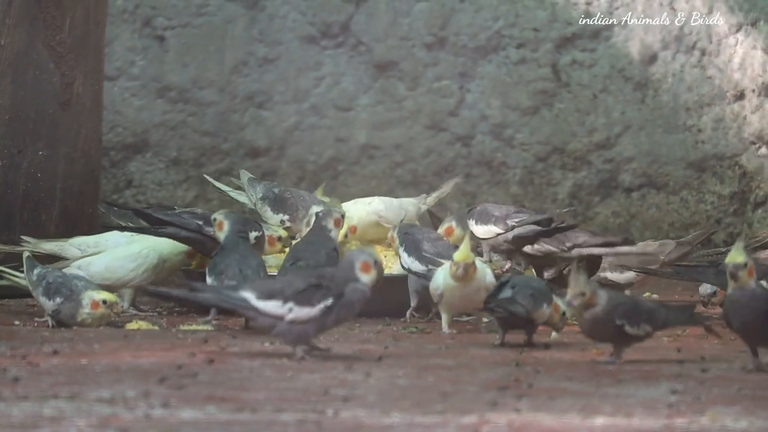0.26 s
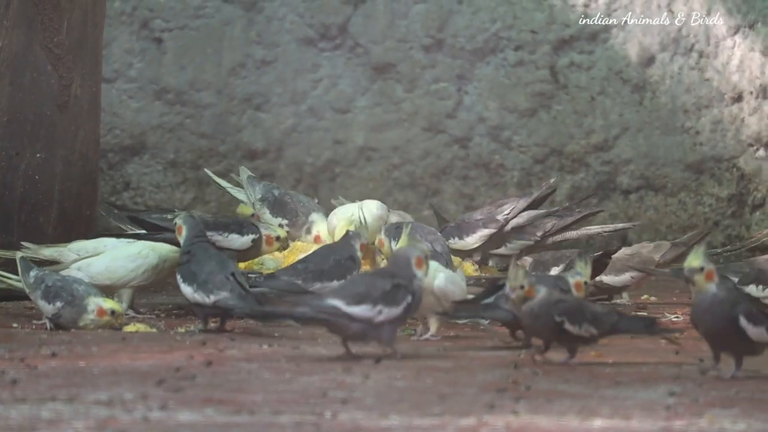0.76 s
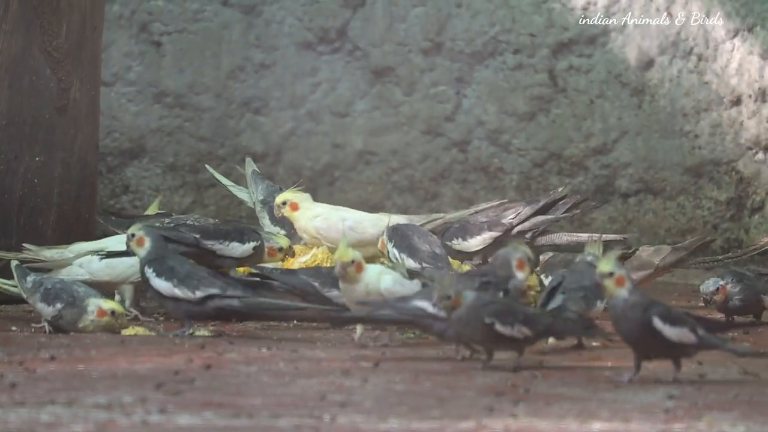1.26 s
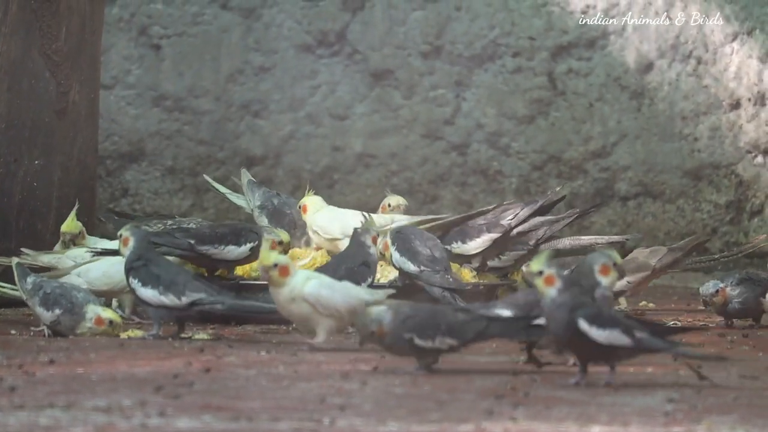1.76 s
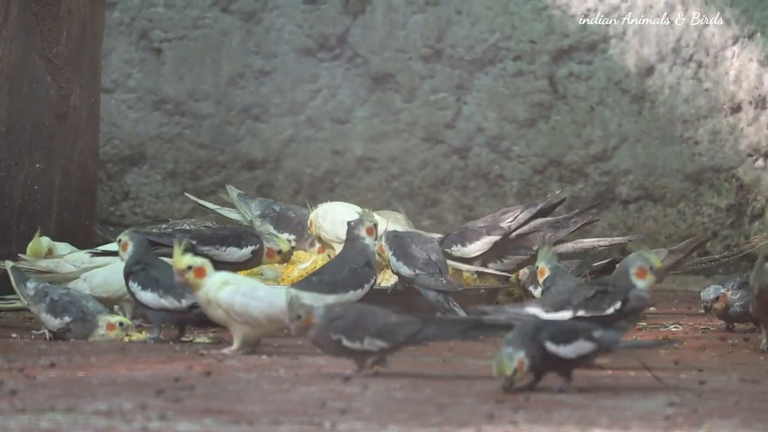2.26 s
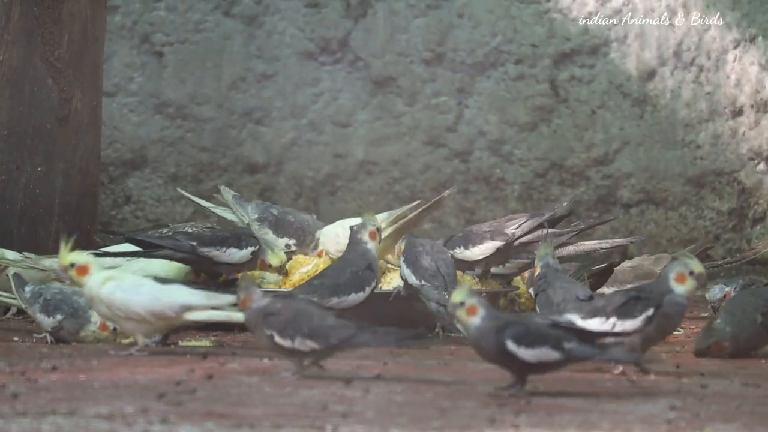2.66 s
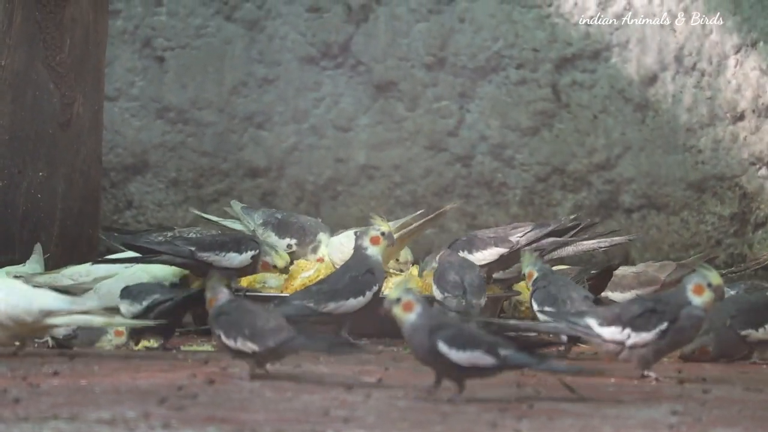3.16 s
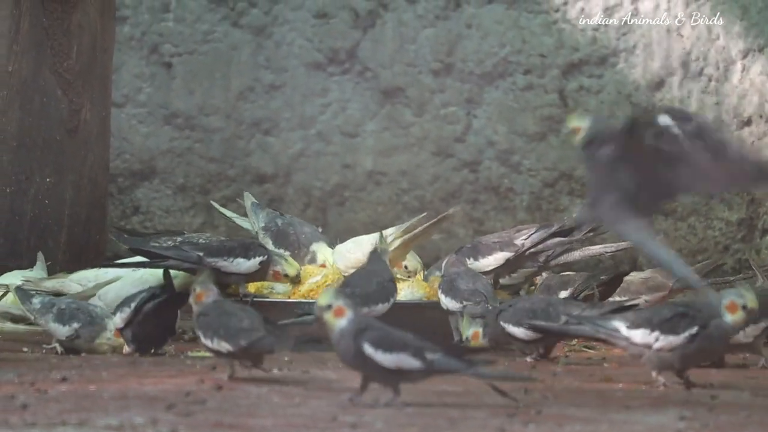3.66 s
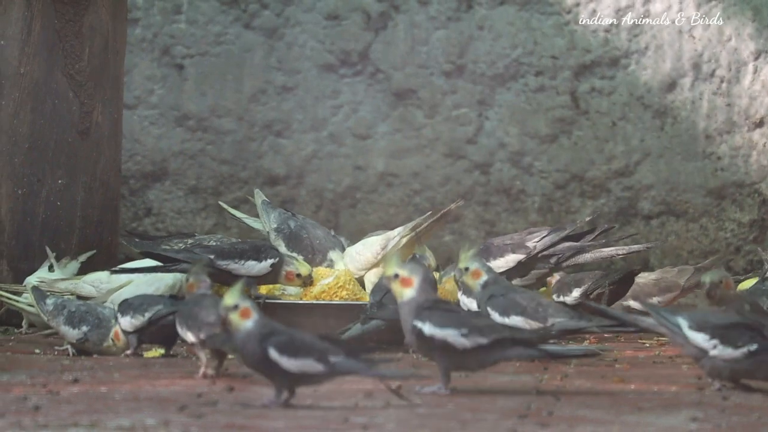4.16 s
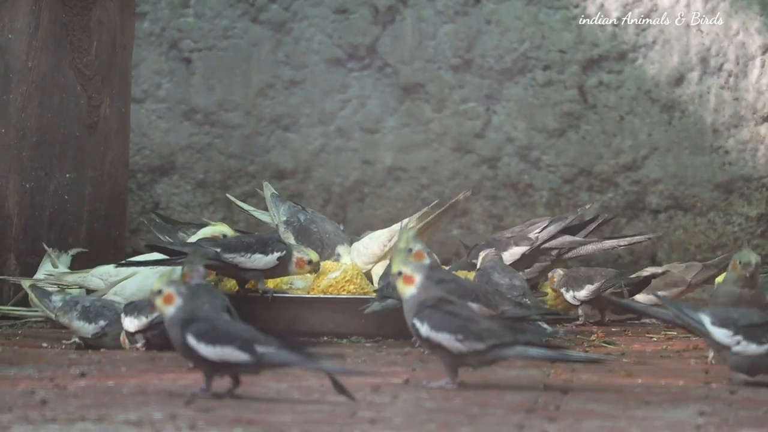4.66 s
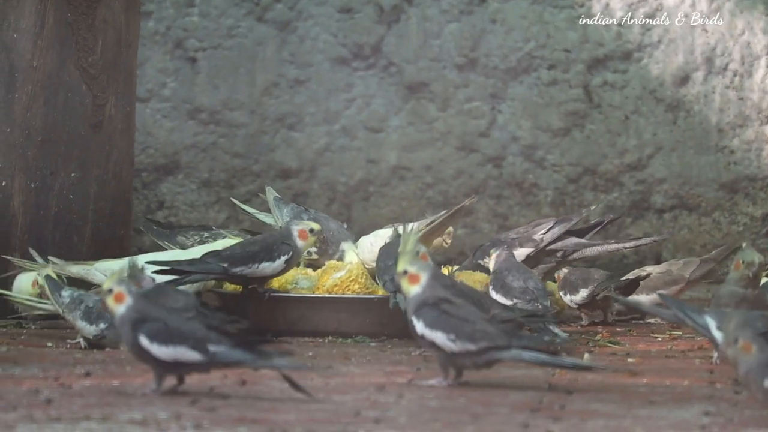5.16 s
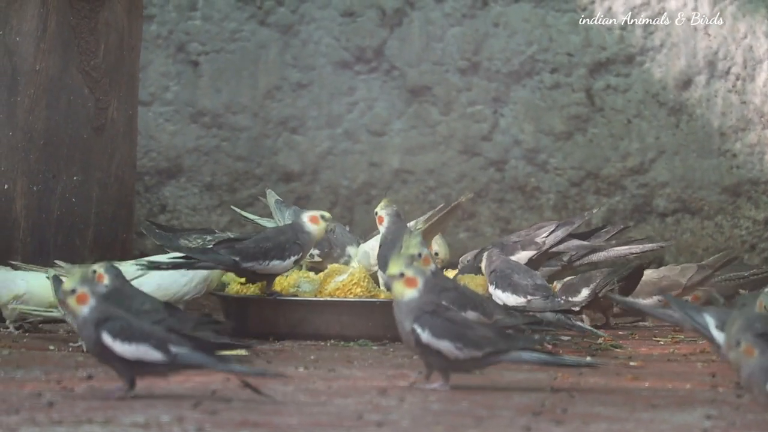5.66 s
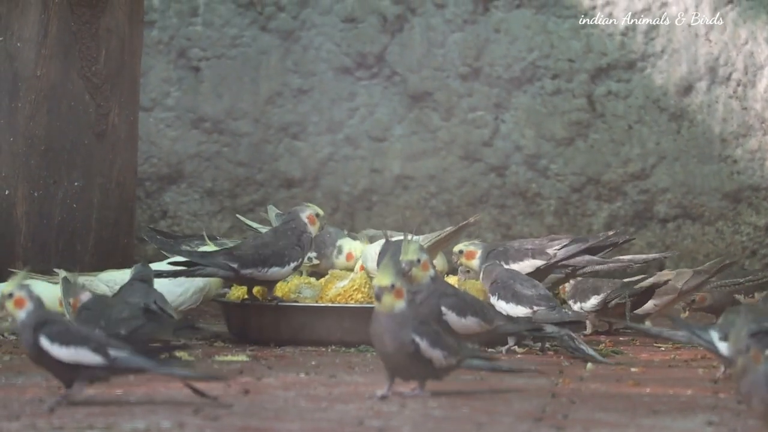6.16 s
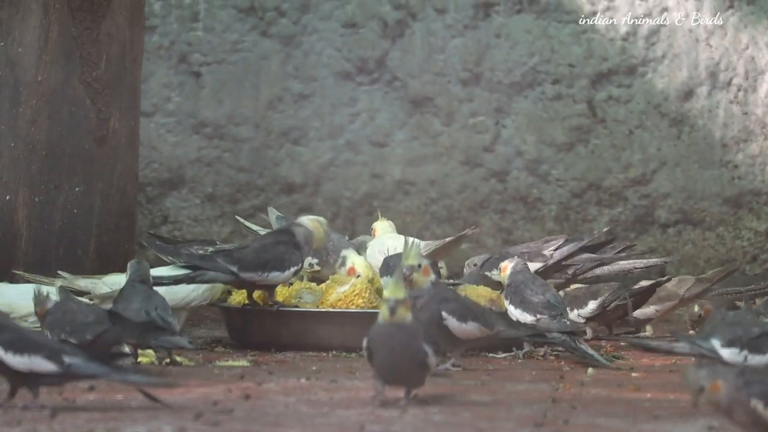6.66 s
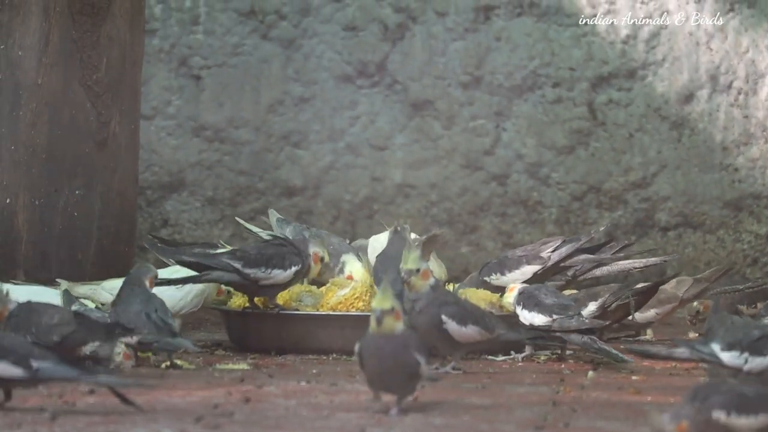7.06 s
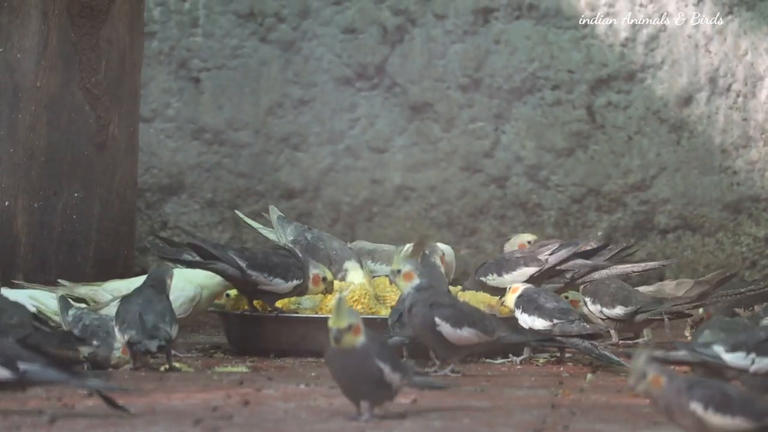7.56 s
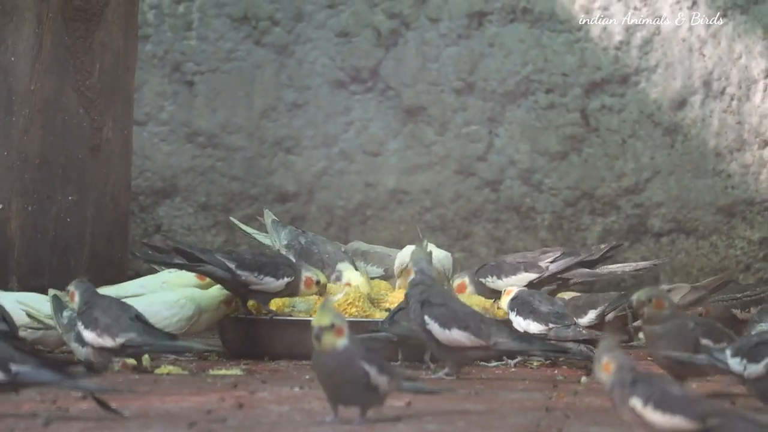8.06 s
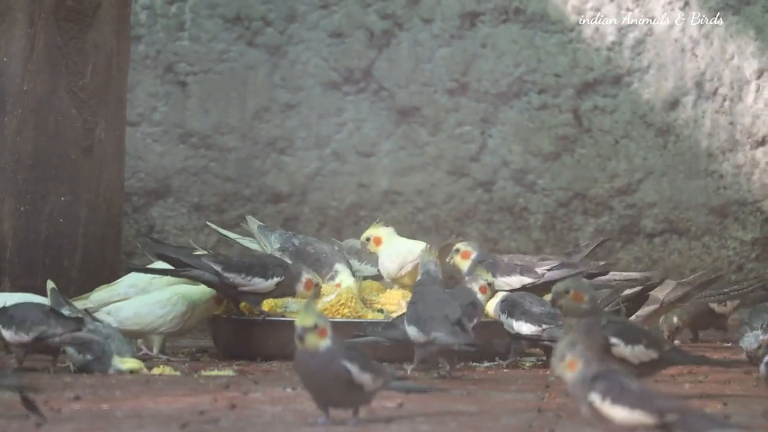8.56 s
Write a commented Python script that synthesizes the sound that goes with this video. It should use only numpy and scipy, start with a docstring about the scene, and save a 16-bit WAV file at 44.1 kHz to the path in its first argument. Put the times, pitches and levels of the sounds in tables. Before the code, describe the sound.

Sharp parrot whistles ring off hard walls among chirps and thin peeps, then raspy begging hisses become nearly continuous over a faint distant rumble.

```python
"""In a walled aviary, a flock of cockatiels calls over a distant rumble.
Whistles, reedy calls, chirps and peeps are wavering tones with overtones, joined by leaking air.
Young birds beg with a hoarse hiss: noise that rings in a throat.
Beating wings and a bird landing are soft puffs of noise. The walls add echoes, and an automatic
level control turns everything down when it gets loud."""
import sys
import numpy as np
from scipy import signal
from scipy.fft import rfft, irfft, next_fast_len
from scipy.io import wavfile
from scipy.ndimage import uniform_filter1d, map_coordinates

SR = 44100
rng = np.random.default_rng(int(sys.argv[2]) if len(sys.argv) > 2 else 0)


def bounce(signal):
    """Save signal as a 16-bit WAV file at the path given by the first command-line argument."""
    frames = np.transpose(np.atleast_2d(signal))
    limited = np.clip(frames, -1, 1)
    pcm = np.round(limited * 32767).astype(np.int16)
    wavfile.write(sys.argv[1], SR, pcm)


N = 387638
TIME = np.arange(N) / SR  # s

# Each call climbs from a low note to its top, holds while sliding to a break, then falls.
# All levels below are before the trim of their own kind of call.
# Soft chirps from the flock: [start t/s, climb t/s, hold t/s, fall t/s, low f/Hz, top f/Hz, break f/Hz,
# level/dB, basic overtone level over the call level/dB]
CHIRPS = [ (-.04, .03, 0.014, 0.027, 1690, 2100, 2015, -42, -9),
          (.03, 0.017, 0.0086, 0.01, 1636, 1885, 1920, -45, 1),
          (.125, 0.0058, 0.0071, 0.02, 1560, 2040, 1800, -49.5, -2),
          (.7, 0.025, 0.036, 0.027, 1700, 2130, 2095, -45, 3),
          (1.09, 0.0142, .03, 0.078, 1644, 2080, 2038, -41, 6),
          (1.655, .06, 0.026, .042, 1880, 2536, 2513, -38, -6),
          (1.8, 0.071, 0.0097, 0.031, 1560, 2310, 2250, -44, 3.5),
          (2.05, .04, 0.051, 0.036, 1450, 1895, 1785, -43, -13),
          (2.21, 0.049, 0.024, 0.034, 1653, 1940, 1844, -40, 2),
          (2.36, .13, 0.028, 0.034, 1670, 1990, 1920, -39, 6),
          (2.78, .06, 0.07, 0.057, 1830, 2043, 1930, -42, 5),
          (3.79, 0.073, 0.075, 0.079, 1680, 2115, 2085, -46, 4),
          (4.08, .035, 0.057, 0.028, 1900, 2187, 2200, -43.5, 4),
          (4.87, .05, .22, 0.11, 1570, 1910, 1785, -44, 3.5),
          (5.56, 0.058, 0.026, 0.067, 1616, 2170, 2110, -49.5, -3),
          (6.98, 0.081, 0.018, 0.046, 1816, 2190, 2180, -39.5, -5),
          (7.09, 0.05, 0.025, .04, 1925, 2210, 2113, -40, -4),
          (7.34, 0.067, 0.036, .03, 1750, 2030, 2000, -43.5, -2),
          (8.19, 0.069, 0.013, 0.056, 1580, 2353, 2260, -45.5, 7),
          (8.36, 0.13, 0.025, 0.033, 1545, 2200, 2100, -42, -3),
          (8.5, .02, .03, .05, 1520, 2050, 1900, -45, -1)]
# Thin peeps from birds further back: [same columns as CHIRPS]
PEEPS = [ (.055, 0.016, .06, 0.026, 2720, 2850, 2890, -42, -12),
         (1.79, .035, .015, 0.028, 3450, 3750, 3700, -38.5, 1),
         (2.05, 0.044, .015, 0.016, 2950, 3700, 3650, -37.5, 8),
         (2.21, .04, .015, .03, 3450, 3960, 3900, -32.5, -1),
         (7.19, 0.051, 0.097, 0.022, 3266, 3490, 3450, -35.5, -6),
         (7.9, 0.026, .22, 0.05, 2880, 2980, 2946, -42.5, -12),
         (8.06, 0.036, 0.13, .05, 3670, 3830, 3750, -37.5, -2),
         (8.22, 0.041, 0.11, 0.056, 2850, 3010, 3000, -40, -10),
         (8.41, 0.054, .07, 0.0427, 3490, 3750, 3850, -34.5, -9),
         (8.56, 0.018, 0.13, .08, 2833, 3040, 2897, -36, -3)]
# Loud contact whistles: [same columns as CHIRPS]
WHISTLES = [ (.367, .1, 0.16, .076, 2074, 3160, 2976, -11.5, 3),
            (.897, 0.091, .136, .058, 2134, 3287, 2988, -11, 1.5),
            (2.222, .09, .195, .05, 2005, 3170, 3020, -11, 1.5),
            (2.738, .084, .148, .068, 2060, 3328, 2949, -12.5, 3),
            (4.29, .068, .207, 0.049, 2050, 3129, 3034, -10, 2),
            (4.87, 0.074, 0.16, .07, 2150, 3235, 3030, -11.5, 3.5)]
# Hoarse calls from further back: [same columns as CHIRPS]
HOARSE_CALLS = [ (1.88, .09, 0.037, 0.052, 1701, 2415, 2362, -25.5, -0.5),
                (2.02, 0.037, 0.045, 0.049, 1872, 2123, 2064, -26.5, -6),
                (4.13, .11, 0.045, .05, 1616, 2510, 2435, -24.5, 0),
                (7.835, 0.0436, 0.018, 0.078, 1732, 2070, 1968, -26, -1)]
# Clear reedy calls from close by: [same columns as CHIRPS]
REEDY_CALLS = [ (4.16, 0.26, 0.092, 0.074, 1760, 2401, 2340, -20, -4),
               (4.86, .19, 0.12, 0.068, 1888, 2493, 2410, -23.5, 0.5),
               (5.71, .07, 0.15, 0.031, 1635, 1913, 1885, -28.5, 1.5),
               (6.425, .09, .105, 0.019, 1633, 2132, 1994, -21, -14)]
# Slow upward calls that start reedy and turn pure on top: [same columns as CHIRPS]
RISING_CALLS = [ (5.695, .185, .112, 0.033, 1920, 3484, 3370, -18, 0.44),
                (7.43, .215, .08, 0.064, 1903, 3370, 3280, -19.5, 1.8)]

# Shape of each kind of call: climb_bend and fall_bend [powers, 1 = straight], onset_db and fade_db
# [level missing at start and end/dB], pure_db [overtone loss on the top note/dB],
# landing [end pitch as a share of the low note]
CHIRP_SHAPE = dict(climb_bend=0.72, fall_bend=1.2, onset_db=3.5, fade_db=6.5, pure_db=2, landing=1.01)
WHISTLE_SHAPE = dict(climb_bend=1.7, fall_bend=0.51, onset_db=21, fade_db=22, pure_db=2, landing=1.01)
HOARSE_SHAPE = dict(climb_bend=0.92, fall_bend=0.54, onset_db=10.5, fade_db=28.5, pure_db=12.5, landing=1.03)
REEDY_SHAPE = dict(climb_bend=.8, fall_bend=1.8, onset_db=15, fade_db=6.5, pure_db=5, landing=0.97)
RISING_SHAPE = dict(climb_bend=0.97, fall_bend=0.99, onset_db=9.5, fade_db=12, pure_db=17, landing=1.02)

# How strongly the throat passes overtones at each pitch: [f/Hz, relative level/dB]
CHIRP_OVERTONES = [(3000, 6), (4200, -10.5), (6000, -18.5), (9000, -39), (15000, -48)]
WHISTLE_OVERTONES = [(3800, -8.5), (5200, -30), (5900, -29), (6200, -39), (6600, -29), (7100, -30),
                     (7900, -43), (9500, -25.5), (11000, -40), (12600, -39.5), (15500, -36)]
REEDY_OVERTONES = [(3500, 4.5), (5000, -6.5), (6300, -9.5), (7600, -17), (10000, -16.5), (12500, -18.5),
                   (15500, -30)]
# Colour of the air rushing through a rough call: [f/Hz, relative level/dB]
BREATH = [(1200, -24), (2500, 13), (4500, -3.5), (7000, -1), (10000, -7.5), (15000, -12)]

# Colour of the distant rumble: [f/Hz, relative level/dB]
RUMBLE = [(20, -58), (38, -11.5), (58, -2), (90, -4), (150, -4.5), (300, -10.5), (520, -14), (1000, -21.5),
          (2000, -19.5), (3200, -18), (4300, -25.5), (6500, -36.5), (10000, -42), (15000, -47)]
# Loudness of the rumble over time: [t/s, level/dB]
RUMBLE_DB = [(0, -34), (7.4, -35), (8.3, -33)]
# How alike the rumble is on the left and right: [f/Hz, likeness 0-1]
LIKENESS = [(60, 1), (250, 0.96), (500, 0.86), (1500, 0.05), (5000, 0.12), (12000, .05)]

# Begging hisses: [start t/s, end t/s, level before the trim/dB, lower resonance f/Hz,
# upper resonance f/Hz, share of the ringing in the lower one 0-1]
HISSES = [ (0.201, 0.511, -35.5, 2950, 3980, 0.1), (1.283, 1.487, -37.5, 2947, 4280, .15),
          (1.444, 1.698, -38.5, 3040, 4004, 0.1), (2.798, 3.187, -37, 3180, 3990, 0.05),
          (3.281, 3.436, -41.5, 3115, 3670, 0.64), (3.54, 3.693, -45, 2900, 4100, .53),
          (4.097, 4.369, -43, 2930, 4440, .03), (5.402, 5.704, -40.5, 2720, 3750, 0.54),
          (6.115, 6.281, -34.5, 3474, 3884, 0.7), (6.305, 6.541, -32, 3680, 4420, 0.8),
          (6.558, 6.792, -30.5, 3270, 4080, 0.9), (6.835, 7.164, -32, 3230, 4000, 0.95),
          (7.186, 7.432, -32.5, 3244, 3760, 0.96), (7.49, 7.815, -34, 3086, 3940, 0.92),
          (7.843, 8.059, -33, 2954, 3630, 0.8), (8.061, 8.25, -35, 3000, 3750, 0.4),
          (8.214, 8.4, -33, 2960, 3760, 0.75), (8.422, 8.636, -38, 2920, 3755, 0.6)]
# Colour of the broad rasp in a hiss: [f/Hz, relative level/dB]
RASP = [(900, -12), (1400, -14.5), (2000, -1), (2900, 9), (4300, 2), (5100, -4), (6000, -8.5), (7800, -4.5),
        (9400, -7.5), (11500, -18.5), (15000, -24)]

# Soft puffs of beating wings, and in the last row a soft bump as a bird lands: [t/s, level/dB]
WING_AND_LANDING_PUFFS = [(3.58, -41), (3.66, -47), (3.74, -58), (3.82, -45), (3.9, -42), (3.98, -45),
                          (4.35, -34.5)]
# Colour of the puffs and the bump: [f/Hz, relative level/dB]
PUFF_COLOUR = [(60, 3), (150, -6), (400, 1), (1000, -5.5), (4000, -13), (12000, -26)]


def from_db(db):
    """Turn decibels into a gain."""
    return 10 ** (np.asarray(db) / 20)


def rms_one(x):
    """Scale a sound so its average strength (rms) is 1."""
    return x / np.sqrt(np.mean(x ** 2) + 1e-20)


def at_hz(points, hz):
    """Read a curve at given pitches, with pitch on a log scale as in hearing."""
    freq, value = np.transpose(points)
    return np.interp(np.log(np.maximum(hz, 1)), np.log(freq), value)


def coloured(spectrum, size):
    """Filter noise to the given colour, with rms 1."""
    padded = next_fast_len(size)
    hz = np.arange(padded // 2 + 1) * SR / padded
    white = rfft(rng.standard_normal(padded))
    return rms_one(irfft(white * from_db(at_hz(spectrum, hz)), padded)[:size])


def drift(rate_hz, size):
    """Smooth random wandering up to about the given rate, drawn through points of spread 1."""
    knots_per_s = rate_hz * 2
    knots = rng.standard_normal(int(size / SR * knots_per_s) + 4)
    return map_coordinates(knots, [1 + np.arange(size) / SR * knots_per_s], order=2)


def span(start, end):
    """The samples between two times in seconds."""
    return slice(max(int(start * SR), 0), min(int(end * SR), N))


def gate(t, start, end, attack_s, release_s):
    """Open smoothly around the start and close smoothly around the end."""
    opening = np.clip(np.minimum((t - start) / attack_s, (end - t) / release_s) + .5, 0, 1)
    return np.sin(opening * np.pi / 2) ** 2


def arch(t, row, climb_bend, fall_bend, onset_db, fade_db, pure_db, landing):
    """Pitch and levels of one call: it swells on the climb, is purest on top and fades on the fall."""
    start, climb_s, hold_s, fall_s, low_hz, top_hz, break_hz, db, reed_db = row
    # progress through each stage, from 0 to 1
    climb = np.clip((t - start) / climb_s, 0, 1)
    hold = np.clip((t - start - climb_s) / hold_s, 0, 1)
    fall = np.clip((t - start - climb_s - hold_s) / fall_s, 0, 1)
    hz = low_hz + (top_hz - low_hz) * climb ** climb_bend
    hz = hz + (break_hz - top_hz) * hold ** 1.3  # the held note slides slowly at first
    hz = hz + (landing * low_hz - break_hz) * fall ** fall_bend
    height = np.clip((hz - low_hz) / (top_hz - low_hz), 0, 1)
    level_db = db - onset_db * (1 - climb) ** 2 - fade_db * fall ** 2
    overtone_db = level_db + reed_db - pure_db * height ** 4.07  # overtones weaken only near the top
    return uniform_filter1d(hz, size=300), level_db, overtone_db


def rough_partial(k, phase, rough):
    """Irregular beating of the voice membranes blurs a partial, the high ones most."""
    scatter = rough * np.sqrt(k)
    beating = drift(260, len(phase)) + 1j * drift(260, len(phase))
    swing = (1 + scatter * beating) / np.sqrt(1 + 2 * scatter ** 2)
    return np.imag(swing * np.exp(1j * k * phase))


def calls(table, shape, overtones, slope_db, waver, warble, rise_rough, fall_rough,
          shimmer_db, hoarse, breath_db):
    """A bird's voice organ makes one tone with overtones, rougher while its pitch glides."""
    out = np.zeros(N)
    for row in table:
        start, end = row[0], row[0] + sum(row[1:4])
        at = span(start - .006, end + .006)
        t = TIME[at]
        size = len(t)
        hz, fundamental_db, overtone_db = arch(t, row, **shape)
        glide = np.clip(np.gradient(hz) * SR / 9000, -1, 1)  # full at 9000 Hz per second
        rough = hoarse + np.abs(glide) * np.where(glide > 0, rise_rough, fall_rough)
        # a quick uneven tremor around 80 Hz
        tremor = np.sin(2 * np.pi * np.cumsum(80 * (1 + 0.26 * drift(20, size))) / SR)
        wobble = waver * (drift(40.2, size) + tremor) + warble * drift(14, size)
        phase = 2 * np.pi * np.cumsum(hz * (1 + wobble)) / SR
        # air leaks past while the voice is rough
        voice = rough * from_db(overtone_db + breath_db) * coloured(BREATH, size)
        for k in range(1, 7):  # the fundamental and five overtones
            level_db = fundamental_db
            if k > 1:
                level_db = overtone_db + at_hz(overtones, k * hz) + slope_db * (k - 2)
            fits = k * hz < SR / 2  # keep only partials that digital sound can hold
            voice += from_db(level_db) * rough_partial(k, phase, rough) * fits
        shimmer = from_db(shimmer_db * drift(68.76, size))  # quick unsteadiness in loudness
        out[at] += np.sqrt(2) * voice * shimmer * gate(t, start, end, .012, .006)
    return out


def chirps():
    """Soft chirps: short, slightly hoarse arches of pitch."""
    return from_db(7.0) * calls(
        CHIRPS, CHIRP_SHAPE, CHIRP_OVERTONES, slope_db=-0.5, waver=.018, warble=.025,
        rise_rough=0.11, fall_rough=0.096, shimmer_db=1.5, hoarse=.24, breath_db=-19)


def place(x, bearing_deg, pan_db):
    """Sound from the left reaches the right ear later; pan_db is how much louder the left is."""
    ear_spacing_m, sound_speed_m_per_s = .12, 343
    lag_s = ear_spacing_m * np.sin(np.radians(bearing_deg)) / sound_speed_m_per_s
    right = map_coordinates(x, [np.arange(len(x)) - lag_s * SR], order=3)
    return np.array([x, right]) * from_db([[pan_db / 2], [-pan_db / 2]])


def aviary(x, early_db=0.5, early_t60_s=.2, late_db=-7.0, late_t60_s=.6, wall_cut_hz=7000):
    """Floor and near walls return a quick echo cluster, then a weaker tail; both lose treble."""
    t = TIME[:SR]
    dulling = signal.butter(2, min(wall_cut_hz, SR / 3), fs=SR, output="sos")
    absorbed = signal.sosfilt(dulling, x + 1e-18)
    out = []
    for direct, thrown in zip(x, absorbed):
        # t60 is the time an echo takes to drop by 60 dB
        sparse = rng.standard_normal(SR) * (rng.random(SR) < .03)
        early = sparse * from_db(-60 * t / early_t60_s) * (t > .002)
        late = rng.standard_normal(SR) * from_db(-60 * t / late_t60_s) * (t > .012)
        echoes = from_db(early_db) * rms_one(early) + from_db(late_db) * rms_one(late)
        out.append(direct + signal.fftconvolve(thrown, echoes / np.sqrt(SR))[:N])
    return np.array(out)


def lingering_echo(x, ring_hz=3062, ring_t60_s=0.21, level_db=0.5):
    """A narrow ring near 3 kHz lingers a little after the birds' sounds."""
    r = from_db(-60 / (ring_t60_s * SR))  # what is left of the ring after one sample
    w = 2 * np.pi * ring_hz / SR
    feed = np.array([1, 0, -1]) * (1 - r * r) / 2
    return from_db(level_db) * signal.lfilter(feed, [1, -2 * r * np.cos(w), r * r], x + 1e-18)


def rumble():
    """Far-off outdoor noise, alike on both sides in the bass and spread out in the treble."""
    size = next_fast_len(N)
    hz = np.arange(size // 2 + 1) * SR / size
    alike = np.clip(at_hz(LIKENESS, hz), 0, 1)
    mid, side = rfft(rng.standard_normal((2, size))) * from_db(at_hz(RUMBLE, hz))
    both = np.sqrt(1 + alike) * mid + np.sqrt(1 - alike) * side * [[1], [-1]]
    noise = irfft(both, size)[:, :N]
    return rms_one(noise) * from_db(np.interp(TIME, *np.transpose(RUMBLE_DB)))


def peeps():
    """Thin peeps: higher, breathier arches of pitch, with the shape of the chirps."""
    return from_db(-1.0) * calls(
        PEEPS, CHIRP_SHAPE, CHIRP_OVERTONES, slope_db=2.0, waver=0.0092, warble=0.0086,
        rise_rough=0.2, fall_rough=.15, shimmer_db=5.0, hoarse=0.41, breath_db=-15)


def resonance(centre_hz, width_hz):
    """Rushing air rings around a moving pitch, with a narrow core that almost whistles."""
    phase, size = 2 * np.pi * np.cumsum(centre_hz) / SR, len(centre_hz)
    skirt = drift(width_hz / 2, size) * np.cos(phase) + drift(width_hz / 2, size) * np.sin(phase)
    core = drift(60, size) * np.cos(phase) + drift(60, size) * np.sin(phase)
    return skirt + from_db(-5.0) * core


def begging(sag=.08, rattle_db=0.5, ringing_db=-1.2, undertone_db=-14.0, upper_db=-23.0,
            patchy_db=7.5, surge_db=1.0):
    """Young birds force air through a rattling throat whose resonances sink during each hiss."""
    out = np.zeros(N)
    for start, end, db, low_hz, high_hz, low_share in HISSES:
        at = span(start - .05, end + .1)
        t = TIME[at]
        size = len(t)
        # throat tuning sinks as the hiss runs out, and wanders a little
        throat = 1 - sag * ((t - start) / (end - start) - .5) + 0.01824 * drift(18, size)
        low, high = from_db(ringing_db) * np.sqrt(np.clip([low_share, 1 - low_share], 0, 1))
        air = low * resonance(low_hz * throat, 450) + high * resonance(high_hz * throat, 620)
        # the windpipe's lowest resonance
        air += high * from_db(undertone_db) * resonance(high_hz / 3 * throat, 203.1)
        for k, ratio in enumerate((1.4, 2.3, 2.65)):  # its high resonances come and go
            swell = from_db(upper_db - 11.0 * k + patchy_db * drift(9.9, size))
            air += swell * resonance(high_hz * ratio * throat, 940)
        air += from_db(patchy_db / 2 * drift(9.28, size)) * coloured(RASP, size)
        loudness = from_db(db + surge_db * drift(12, size) + rattle_db * drift(130, size))
        out[at] += air * loudness * gate(t, start, end, .025, .16)
    return from_db(-0.5) * out


def whistles():
    """Loud contact whistles: tall arches, roughest on the climb."""
    return from_db(-3.5) * calls(
        WHISTLES, WHISTLE_SHAPE, WHISTLE_OVERTONES, slope_db=-1.0, waver=0.00936, warble=.008,
        rise_rough=0.82, fall_rough=0.19, shimmer_db=2.0, hoarse=0.045, breath_db=-21.5)


def hoarse_calls():
    """Hoarse calls: a rough, wavering voice throughout."""
    return from_db(-2.0) * calls(
        HOARSE_CALLS, HOARSE_SHAPE, REEDY_OVERTONES, slope_db=-3.5, waver=0.0166, warble=0.018,
        rise_rough=0.35, fall_rough=0.12, shimmer_db=-2.5, hoarse=.26, breath_db=-17)


def wings_and_landing(puff_s=0.014):
    """Soft puffs of beating wings, and one soft bump as a bird lands."""
    puffs = sum(from_db(db) * np.exp(-((TIME - s) / puff_s) ** 2) for s, db in WING_AND_LANDING_PUFFS)
    return puffs * coloured(PUFF_COLOUR, N)


def reedy_calls():
    """Reedy calls: lower tones with overtones and plenty of breath."""
    return from_db(-5.0) * calls(
        REEDY_CALLS, REEDY_SHAPE, REEDY_OVERTONES, slope_db=-1.0, waver=0.0061, warble=0.00451,
        rise_rough=0.26, fall_rough=0.04, shimmer_db=4.0, hoarse=0.14, breath_db=-11)


def rising_calls():
    """Slow upward calls: overtones weaken as the voice nears its top."""
    return from_db(-3.5) * calls(
        RISING_CALLS, RISING_SHAPE, REEDY_OVERTONES, slope_db=-1.5, waver=0.0073, warble=.01,
        rise_rough=0.14, fall_rough=0.072, shimmer_db=1.0, hoarse=0.1, breath_db=-16)


def scene():
    """Callers sit ahead, a touch louder on the right; the young birds beg from the left."""
    birds = place(chirps() + peeps(), bearing_deg=1.7, pan_db=-1.5)
    birds += place(begging(), bearing_deg=33.8, pan_db=1.5)
    birds += place(whistles(), bearing_deg=4.5, pan_db=-1.8)
    birds += place(hoarse_calls() + reedy_calls() + rising_calls(), bearing_deg=1, pan_db=-1.5)
    birds += place(wings_and_landing(), bearing_deg=-3, pan_db=1.0)
    return aviary(birds) + lingering_echo(birds) + rumble()


def record(dry, threshold_db=-13.0, attack_s=0.014, recovery_db_per_s=17, cutoff_hz=15400):
    """Level control turns loud moments down and recovers slowly; the top treble is cut steeply."""
    power = uniform_filter1d(np.mean(dry ** 2, axis=0), size=300)
    over_db = np.maximum(10 * np.log10(np.abs(power) + 1e-12) - threshold_db, 0)
    # hold each peak, letting it sink at the recovery rate
    recovered_db = recovery_db_per_s * TIME
    held_db = np.maximum.accumulate(over_db + recovered_db) - recovered_db
    keep = np.exp(-1 / (attack_s * SR))
    cut_db = signal.lfilter([1 - keep], [1, -keep], held_db)
    ducked = dry * from_db(-cut_db)
    return signal.sosfilt(signal.ellip(12, .1, 90, cutoff_hz, fs=SR, output="sos"), ducked)


dry = scene()
out = record(dry)
bounce(out)
```